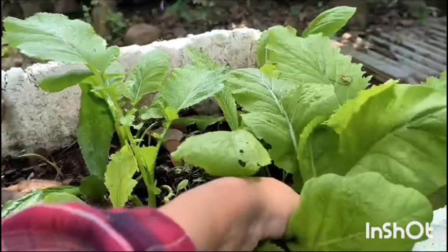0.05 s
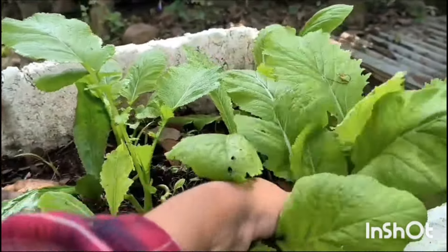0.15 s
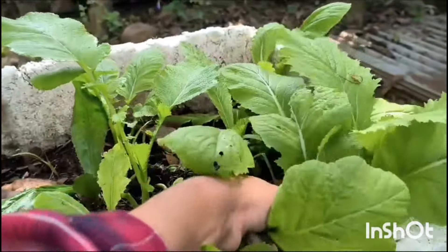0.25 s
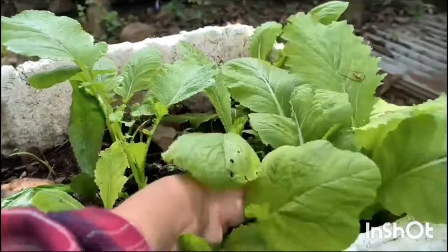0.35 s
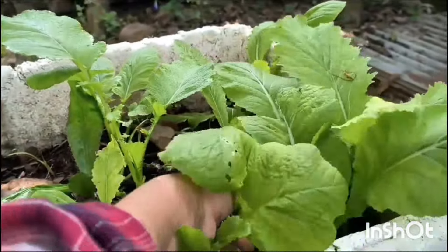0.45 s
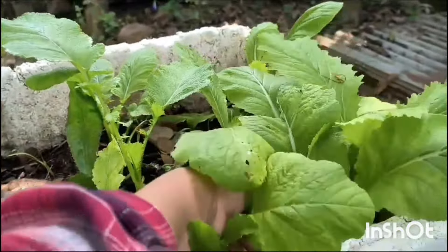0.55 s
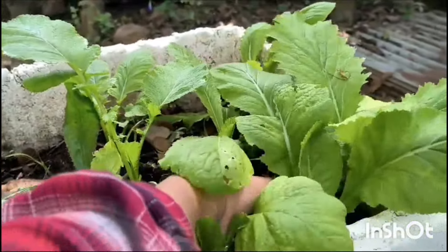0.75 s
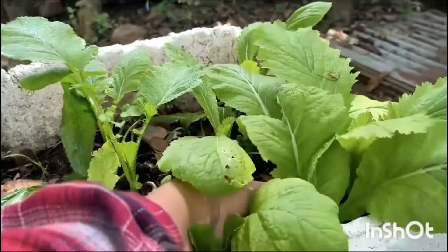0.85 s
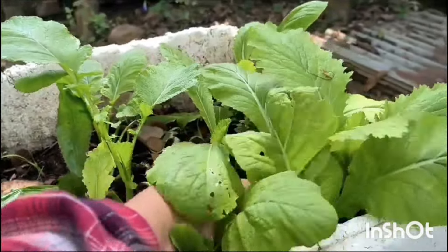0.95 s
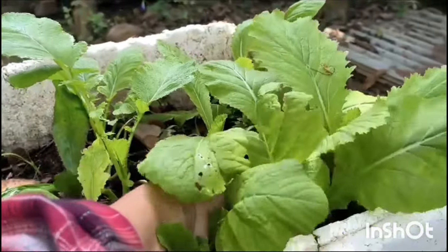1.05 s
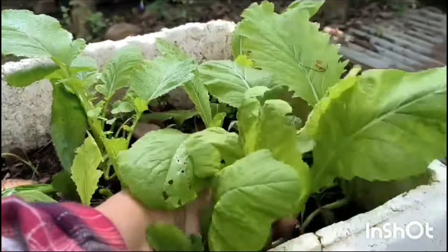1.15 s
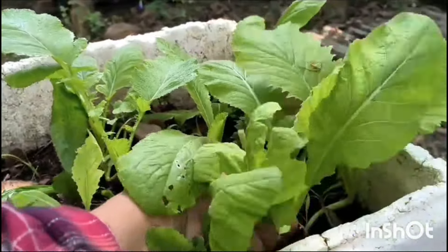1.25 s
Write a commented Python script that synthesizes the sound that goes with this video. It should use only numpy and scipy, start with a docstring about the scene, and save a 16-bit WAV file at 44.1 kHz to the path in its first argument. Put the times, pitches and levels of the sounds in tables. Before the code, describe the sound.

A crisp vegetable stalk snaps close to the microphone. Leaves rustle first, with a bump at 0.1 seconds; fibres start cracking and break at about 0.25 seconds with a loud, hollow pop, a low thump and a short echo. A leaf hisses off the hand at 0.4 seconds, followed by another bump. Soft rustles, ticks and light knocks continue until 1.3 seconds over a faint, distant motor hum.

```python
"""A motor hums far away while a hand works among leafy greens in a planter, close to the microphone.
Leaves rub by friction and the hand bumps a stalk. At 0.22 s the fibres of one crisp, juicy stalk start
to fracture; at 0.24 s it snaps, its hollow resonates, and the recorder overloads with a low thump.
Hard walls reverberate as a leaf slides off the skin; leaves tick and more stalks are bumped until 1.3 s."""
import sys
import numpy as np
from scipy import signal
from scipy.fft import rfft, irfft, next_fast_len
from scipy.io import wavfile
from scipy.ndimage import map_coordinates

SR = 44100
rng = np.random.default_rng(int(sys.argv[2]) if len(sys.argv) > 2 else 0)


def wav_record(signal):
    """Record a signal, one row per channel, as 16-bit PCM in the file named by sys.argv[1]."""
    frames = np.transpose(np.atleast_2d(signal))
    bounded = np.clip(frames, -1, 1)
    # unit amplitude maps onto the largest positive 16-bit level
    quanta = np.round(bounded * 32767).astype(np.int16)
    wavfile.write(sys.argv[1], SR, quanta)


N = 57330


def amp(db):
    """Amplitude ratio of a level in decibels."""
    return 10 ** (np.asarray(db) / 20)


def unit(x):
    """Normalisation to rms 1."""
    return x / np.sqrt(np.mean(x ** 2) + 1e-20)


def along(points, hz):
    """Interpolation of (f/Hz, value) points on a logarithmic frequency axis."""
    f, v = np.transpose(points)
    return np.interp(np.log(hz + 1), np.log(f + 1), v)


def since(s):
    """Time elapsed since s seconds, zero before."""
    return np.maximum(np.arange(N) / SR - s, 0)


def wobble(rate):
    """Random modulation: a spline through rate knots a second."""
    return map_coordinates(rng.standard_normal(4096), [np.arange(N) * rate / SR], mode="mirror")


def burst(s, db, rise, t60):
    """Damped transient: a linear rise, then exponential decay by 60 dB in t60 seconds."""
    return amp(db - 60 * since(s + rise) / t60) * np.minimum(since(s) / rise, 1)


def filtered(x, response):
    """Linear filtering: the spectrum of x times a frequency response."""
    size = next_fast_len(N + SR // 2)
    return irfft(rfft(x, size) * response(np.fft.rfftfreq(size, 1 / SR)), size)[..., :N]


def pan(db):
    """Level difference: the left gain exceeds the right by db."""
    return amp(db * np.array([[.5], [-.5]]))


def arrive(x, lead_s):
    """Time difference: sound reaches the right microphone lead_s before the left."""
    return filtered(x, lambda hz: np.exp(1j * np.pi * hz * lead_s * np.array([[-1], [1]])))


def stereo(pair, spectrum, coherence):
    """Partial coherence: two independent signals, mixed as mid and side, give a pair of rms 1."""
    def weights(hz):
        angle = np.arccos(np.clip(along(coherence, hz), -1, 1)) / 2
        return amp(along(spectrum, hz)) * [np.cos(angle), np.sin(angle)]
    mid, side = filtered(pair, weights)
    return unit(np.array([mid + side, mid - side]))


# left-right coherence of direct and of diffuse sound [f/Hz, coherence before limiting to +-1]
DIRECT_COHERENCE = [(100, 0.5), (400, 1.46), (1200, 0.6), (3000, 0.31), (12000, -0.34)]
DIFFUSE_COHERENCE = [(100, 0.7), (300, 0.72), (640, 0.45), (1200, -0.03), (2500, -0.15), (6000, 0.17)]


def noise(spectrum, coherence=DIRECT_COHERENCE):
    """Spectrally shaped Gaussian noise, in stereo, of rms 1."""
    return stereo(rng.standard_normal((2, N)), spectrum, coherence)


def grains(spectrum, per_s, spread_db):
    """Shot noise: randomly timed clicks of uneven size, in stereo, of rms 1."""
    occurs = rng.random(N) < per_s / SR
    sizes = amp(spread_db * np.minimum(rng.exponential(size=N), 5))
    return stereo(occurs * sizes * rng.standard_normal((2, N)), spectrum, DIRECT_COHERENCE)


# motor harmonics [multiple of shaft frequency, initial level/dB, final level/dB]
MOTOR_HARMONICS = [(3, -54, -55.5), (4, -52, -61), (5, -47.5, -48.5), (6, -54.5, -43)]
# spectrum of the outdoor air [f/Hz, level/dB]
AIR_SPECTRUM = [(25, -22), (50, -7), (90, -11.5), (180, 2), (380, -2.5), (600, -17), (1200, -16.5),
                (3500, -20), (8000, -32.5), (15000, -35)]


def distant_motor(shaft_hz=32.77, waver_rad=0.95, air_db=-43):
    """Periodic rotation radiates harmonics of the shaft frequency, wavering over the ambient noise."""
    hum = 0
    for k, first_db, last_db in MOTOR_HARMONICS:
        phase = 2 * np.pi * (k * shaft_hz * since(0) + rng.random()) + waver_rad * wobble(8.11)
        hum += amp(np.linspace(first_db, last_db, N)) * np.sqrt(2) * np.sin(phase)
    return hum + amp(air_db) * noise(AIR_SPECTRUM, DIFFUSE_COHERENCE)


# spectrum of the wall reflections [f/Hz, level/dB]
WALL_SPECTRUM = [(100, -3), (400, -8), (660, -14), (790, -3.5), (920, -24), (1070, -2), (1300, -14.5),
                 (2300, 0), (3400, -1.5), (4600, 0), (4900, 10), (5250, 2), (7000, 8), (10000, -7),
                 (15000, 2)]
# reverberation time [f/Hz, T60/s]
REVERB_TIME = [(200, 0.49), (1000, 0.83), (4500, 0.64), (8000, 0.53), (14000, 0.76)]


def walls(x, early_t60_s=0.3, early_db=-4, late_db=-5, build_up_s=0.0057):
    """Reverberation: convolution with dense early reflections and a longer ring between hard walls."""
    hz, t, bands = signal.stft(noise(WALL_SPECTRUM, DIFFUSE_COHERENCE), SR, nperseg=256)
    decay = amp(-60 * t / along(REVERB_TIME, hz)[:, None])
    late = signal.istft(bands * decay, SR, nperseg=256)[1][:, :N]
    early = noise(WALL_SPECTRUM, DIFFUSE_COHERENCE) * amp(-60 * since(0) / early_t60_s)
    onset = np.minimum(since(0) / build_up_s, 1) ** 2
    response = (amp(early_db) * unit(early * onset) + amp(late_db) * unit(late * onset)) / np.sqrt(N)
    return signal.fftconvolve(x, response, axes=1)[:, :N]


# envelopes of leaves rubbing and of whole leaves flapping aside [t/s, level/dB]
RUB_ENVELOPE = [(0, -32.5), (0.072, -36.5), (0.096, -36.5), (0.152, -34), (.175, -53), (.2, -31),
                (.46, -30), (.55, -41), (.61, -36.5), (0.683, -54), (0.783, -39.5), (.84, -47),
                (.95, -43.5), (1.006, -38), (1.044, -47.5), (1.08, -36.5), (1.129, -32.5), (1.157, -28),
                (1.179, -40.5), (1.235, -48), (1.265, -40), (1.3, -31.5)]
FLAP_ENVELOPE = [(0, -54.5), (.3, -42.5), (.42, -43.5), (.5, -56), (.6, -52.5), (1.0, -53.5), (1.12, -43),
                 (1.25, -42.5), (1.3, -41)]
# leaf edges flicking [t/s, tick level/dB, sizzle level/dB]
FLICKS = [(0.187, -39, -31), (0.391, -22, -48), (.537, -27.5, -34), (0.543, -32.5, -25), (.577, -29.5, -62),
          (0.601, -32, -63), (0.618, -44, -31), (0.756, -36, -55), (0.7783, -33, -49), (0.8077, -43, -52),
          (0.962, -32, -57), (1.0758, -30.5, -50), (1.1047, -31, -51), (1.199, -42, -35)]
# spectra of rubs and ticks, narrow rasp, dull flapping and high sizzle [f/Hz, level/dB]
LEAF_SPECTRUM = [(100, -8), (350, -8.5), (650, -8.5), (1100, -3), (1600, -1.5), (2600, -0.5), (4200, 0.5),
                 (7500, -13), (12000, -13.5), (15500, -9.5)]
RASP_SPECTRUM = [(1800, -39), (4300, 0), (9000, -20)]
FLAP_SPECTRUM = [(40, -25), (90, 2), (250, -2), (430, 3.5), (620, -8), (1100, -10), (2000, -26.5)]
SIZZLE_SPECTRUM = [(2000, -32), (5000, 4.5), (8000, -9), (11500, 0), (15500, 3)]


def leaves(slips_per_s=3000, spread_db=0.5, flutter_db=2, flick_rise_s=0.00072, flick_t60_s=0.035):
    """Friction noise: tiny slips of leaf on leaf and skin, with dull flapping and sharper flicks."""
    effort = amp(np.interp(since(0), *np.transpose(RUB_ENVELOPE)) + flutter_db * wobble(90.6))
    rub = effort * grains(LEAF_SPECTRUM, slips_per_s, spread_db)
    brush = burst(0, db=-33, rise=0.031, t60=0.29)  # a waxy leaf brushes the hand
    rasp = brush * grains(RASP_SPECTRUM, slips_per_s, spread_db)
    flap = amp(np.interp(since(0), *np.transpose(FLAP_ENVELOPE))) * noise(FLAP_SPECTRUM)
    ticks = sum(burst(s, db, flick_rise_s, flick_t60_s) for s, db, _ in FLICKS)
    sizzle = sum(burst(s, db, flick_rise_s, flick_t60_s) for s, _, db in FLICKS)
    slide = burst(0.395, db=-27.5, rise=0.029, t60=0.19)  # a leaf hisses off the skin
    return rub + rasp + flap + ticks * noise(LEAF_SPECTRUM) + (slide + sizzle) * noise(SIZZLE_SPECTRUM)


# the hand striking stalks, and at 1.065 s and 1.152 s slower strokes [t/s, crunch level/dB, rise/s, crunch
# T60/s, thud # level/dB]
IMPACTS = [(0.105, -17, 0.00017, 0.026, -40), (0.1094, -22, 0.003, 0.023, -20.5),
           (0.4734, -16.5, 0.0049, 0.017, -19), (1.065, -32.5, 0.012, 0.053, -37),
           (1.152, -30.5, 0.014, 0.047, -38), (1.2798, -17, 0.00057, 0.018, -30)]
# spectrum of the crunch [f/Hz, level/dB]
CRUNCH_SPECTRUM = [(60, -3), (300, 4), (600, -9), (1000, 0.5), (1700, -5.5), (2600, -2.5), (3800, -0.5),
                   (7500, -9.5), (12000, -10.5), (15500, -8)]
# modes of the planter [f/Hz, level/dB, T60/s]
PLANTER_MODES = [(88.5, -15.5, 0.14), (220, -6, 0.051), (344.5, -1, 0.031), (933, -11, 0.02)]


def bumps():
    """Impact excitation: each bump or stroke crunches the stalks and rings the planter's damped modes."""
    crunch = sum(burst(s, db, rise, t60) for s, db, rise, t60, _ in IMPACTS)
    thud = sum(burst(s, db + mode_db, rise, t60) * np.sin(2 * np.pi * hz * since(s))
               for s, _, rise, _, db in IMPACTS for hz, mode_db, t60 in PLANTER_MODES)
    return crunch * noise(CRUNCH_SPECTRUM) + thud


def overload_thump(s, gain_db=-35, peak_s=0.0042):
    """Critically damped pulse: a brief low thump as the snap overloads the recorder."""
    t = since(s)
    return amp(gain_db) * t / peak_s * np.exp(-t / peak_s)


# fibres breaking [t/s, level/dB, T60/s, left minus right/dB]
FRACTURES = [(0.2223, -10.5, 0.017, -7), (0.2314, -18, 0.037, -4), (0.2407, -12.5, 0.038, -4),
             (.2440, 3, 0.015, 2), (0.2519, -5, 0.011, -2), (0.2559, -2, 0.016, 0.5),
             (0.2663, -5.5, 0.015, 4.5), (.2762, -8, 0.016, 2.5), (.2840, -8.5, .024, 2),
             (0.3073, -9.5, 0.011, 3.5), (.3140, -17.5, 0.013, 8)]
# spectrum of the bursting cells [f/Hz, level/dB]
FRACTURE_SPECTRUM = [(30, -40), (200, -13.5), (430, -0.5), (640, -8.5), (1100, -1), (1500, -3), (2200, 0.5),
                     (3000, 0.5), (4800, -0.5), (7500, -12.5), (11000, -8.5), (15500, -24)]


def fibre_cracks(rise_s=0.00068):
    """Acoustic emission in fracture: bundles of cells burst one after another."""
    tearing = sum(pan(side_db) * burst(s, db, rise_s, t60) for s, db, t60, side_db in FRACTURES)
    return tearing * grains(FRACTURE_SPECTRUM, per_s=12000, spread_db=1)


# the stalk's wall giving way [t/s, level/dB]
BREAKS = [(.2443, 0.5), (.2662, -6.5)]
# modes ringing at each break: the hollow stalk, and at 791 Hz the walls [f/Hz, level/dB, T60/s, left minus
# right/dB]
BREAK_MODES = [(424, -10, 0.042, 2.5), (791, -19, 0.11, 3), (1089, -7.5, 0.034, 2.5), (2190, -11, 0.018, 8),
               (4883, -14, 0.093, -2)]


def stalk_pop(rise_s=0.0021, waver_rad=0.3):
    """Modal resonance: each big break rings the hollow stalk and a mode of the walls."""
    ring = 0
    for s, db in BREAKS:
        for hz, mode_db, t60, side_db in BREAK_MODES:
            phase = 2 * np.pi * hz * since(s) + waver_rad * wobble(150.4)
            ring += pan(side_db) * burst(s, db + mode_db, rise_s, t60) * np.sin(phase)
    return ring


def scene():
    """Superposition of direct sound, reverberation and background; the snap excites the walls most."""
    snap = fibre_cracks() + stalk_pop() + overload_thump(BREAKS[0][0])
    handling = (bumps() + leaves()) * pan(db=-3)
    # the stalk is to the right, the hand near the middle
    direct = arrive(snap, lead_s=0.00037) + arrive(handling, lead_s=-0.000092)
    return direct + walls(snap + amp(-17) * handling) + distant_motor()


# frequency response of the microphone ports [f/Hz, level/dB]
PORT_RESPONSE = [(25, -16), (50, -14.5), (80, -1), (8400, 0.5), (8750, -5.5), (9300, -3), (9900, -4),
                 (10800, 3.5), (12500, -2)]
# imbalance of the two ports [f/Hz, left minus right/dB]
PORT_BALANCE = [(100, -2), (400, -0.5), (1100, 2.5), (2600, -4.5), (4400, -2.5), (7000, 3), (11000, 7.5),
                (15000, 9.5)]


def record(dry):
    """Saturation: the ports colour the sound, the snap is hard-clipped, and a low-pass limits the band."""
    clip_level, band_limit_hz = 0.91, 15900
    coloured = filtered(dry, lambda hz: amp(along(PORT_RESPONSE, hz)) * pan(along(PORT_BALANCE, hz)))
    clipped = np.clip(coloured, -clip_level, clip_level)
    return filtered(clipped, lambda hz: hz < band_limit_hz)


dry = scene()
out = record(dry)
wav_record(out)
```